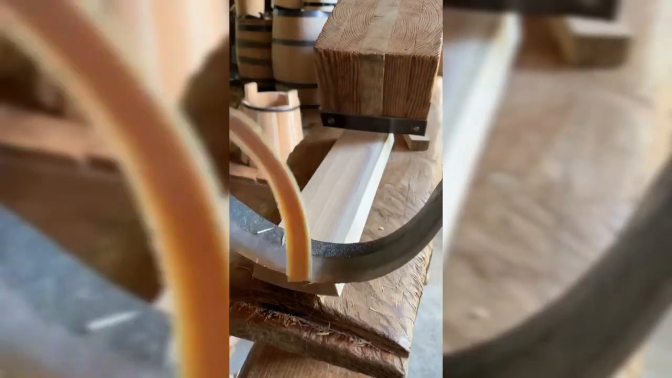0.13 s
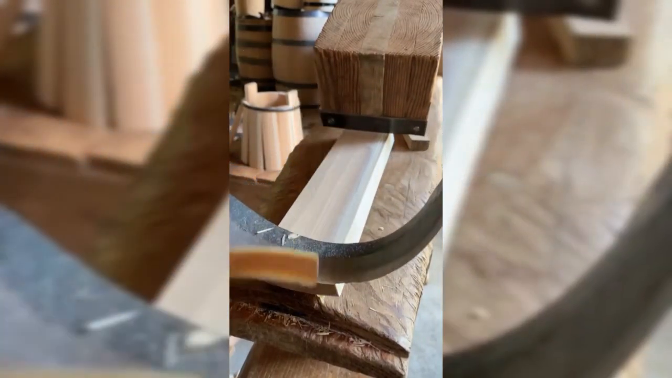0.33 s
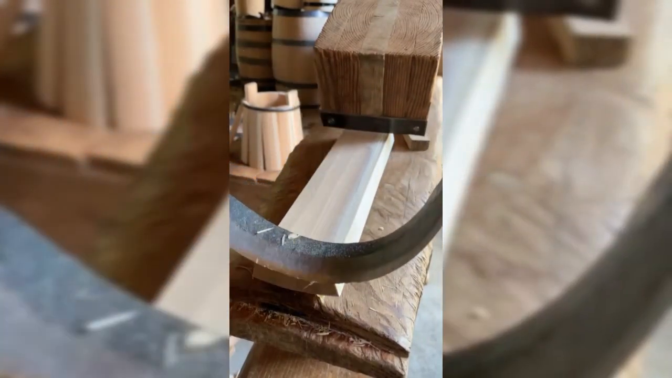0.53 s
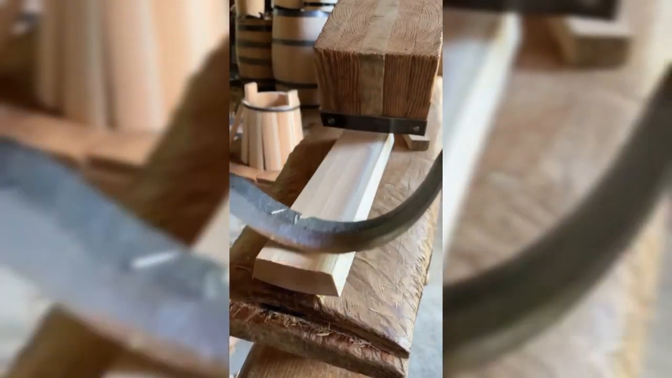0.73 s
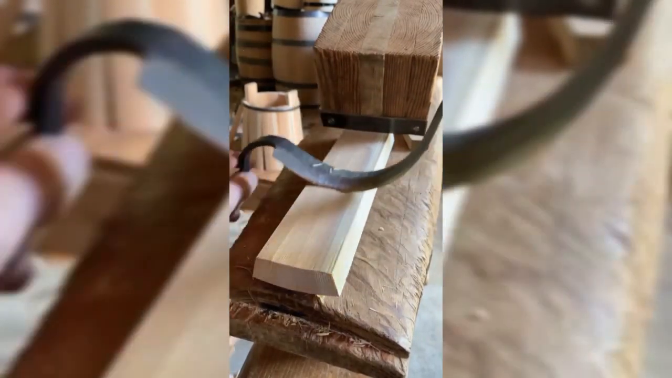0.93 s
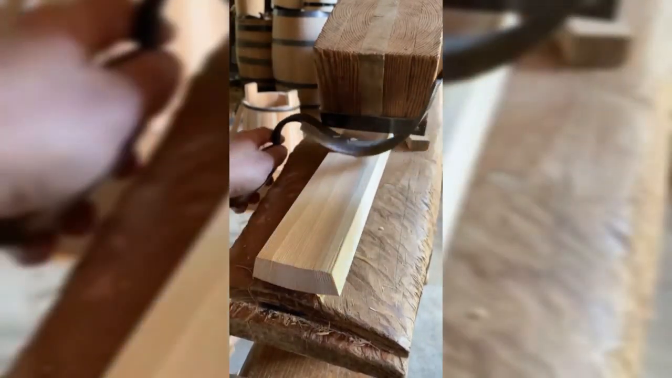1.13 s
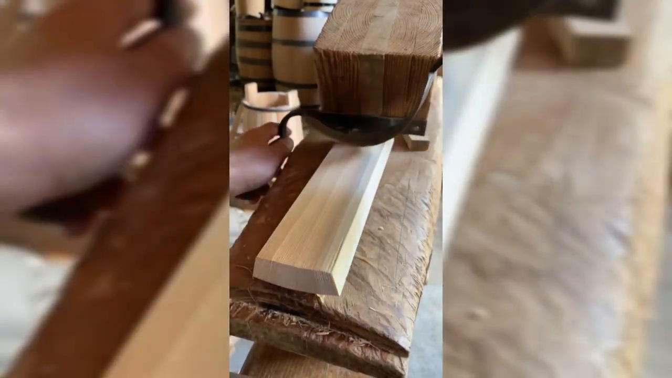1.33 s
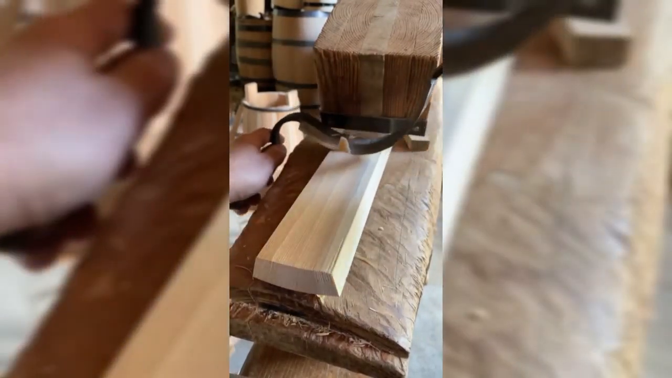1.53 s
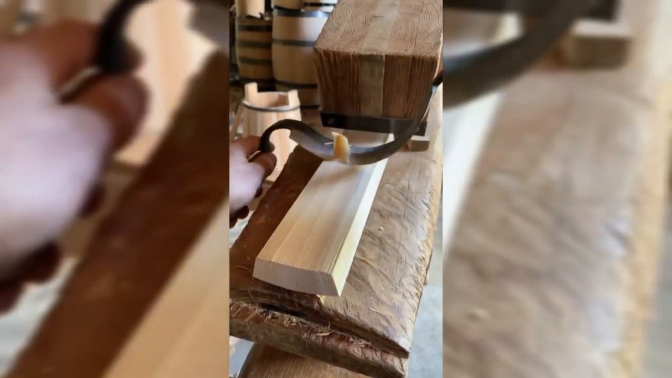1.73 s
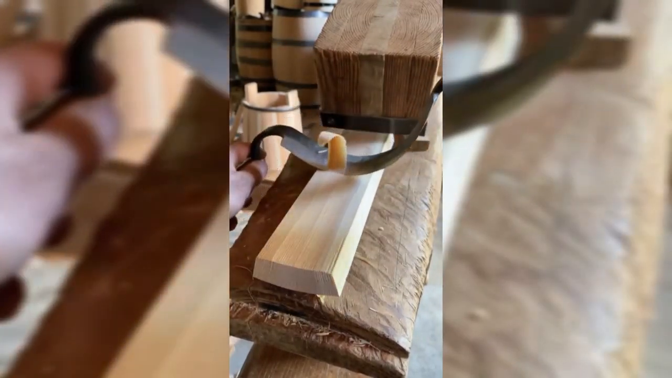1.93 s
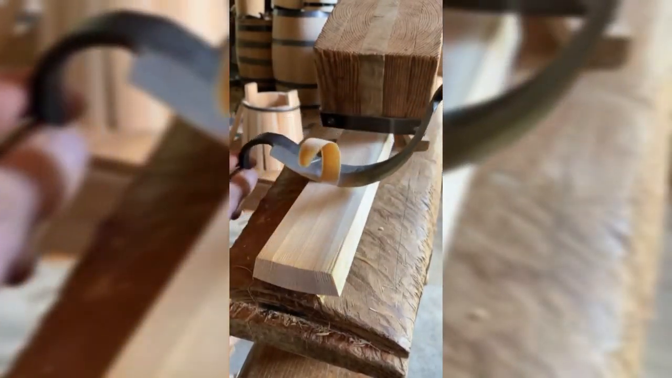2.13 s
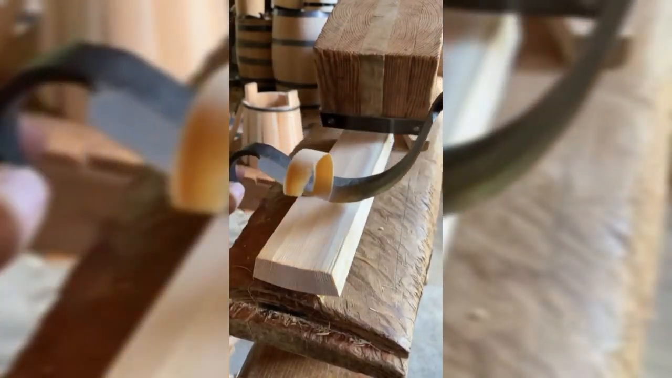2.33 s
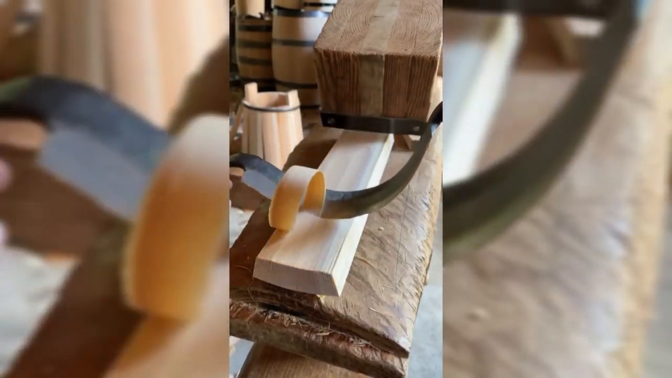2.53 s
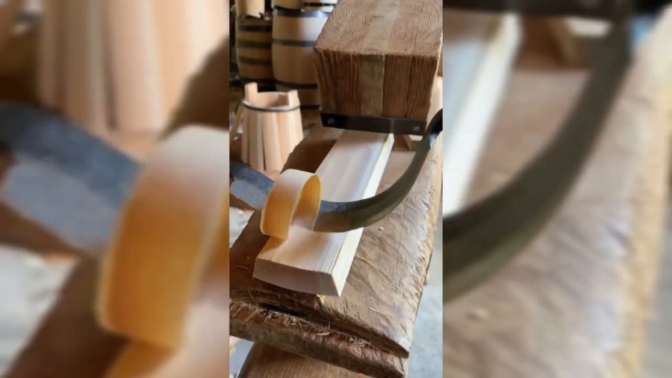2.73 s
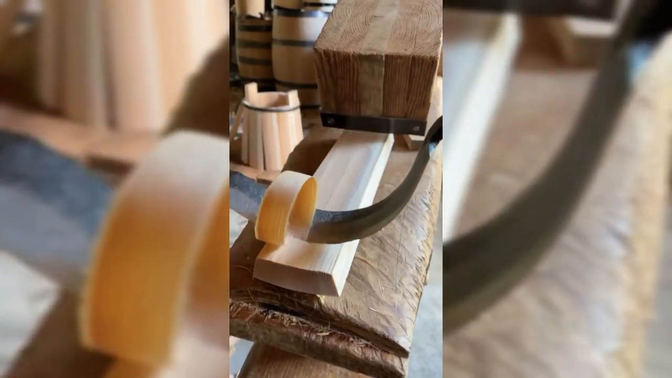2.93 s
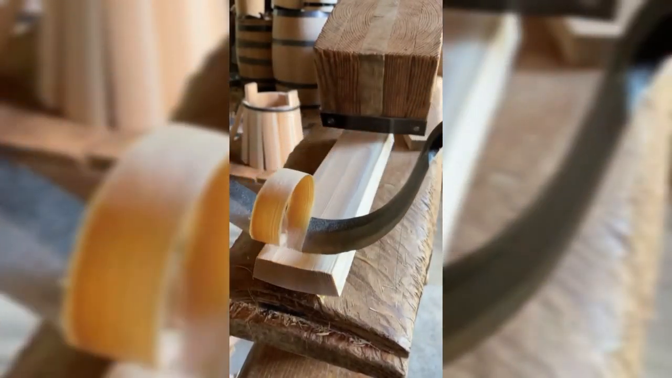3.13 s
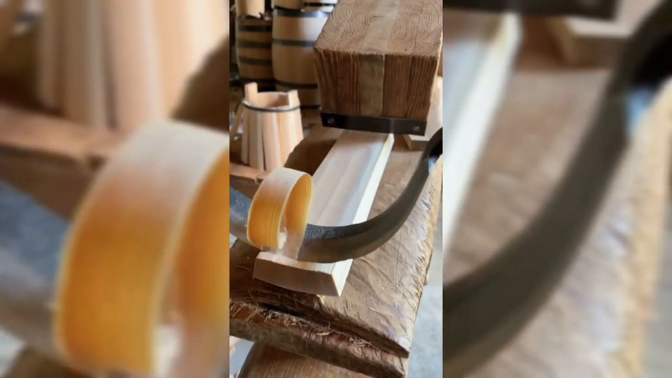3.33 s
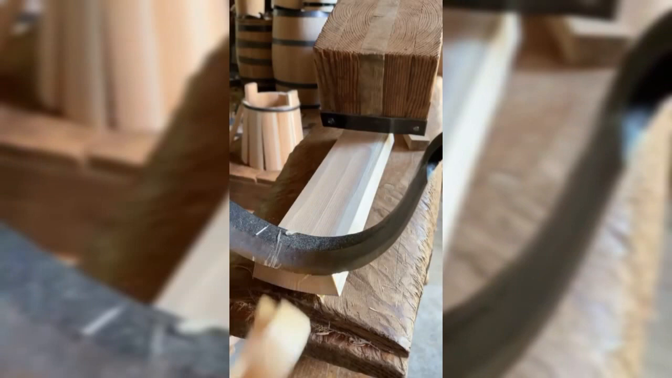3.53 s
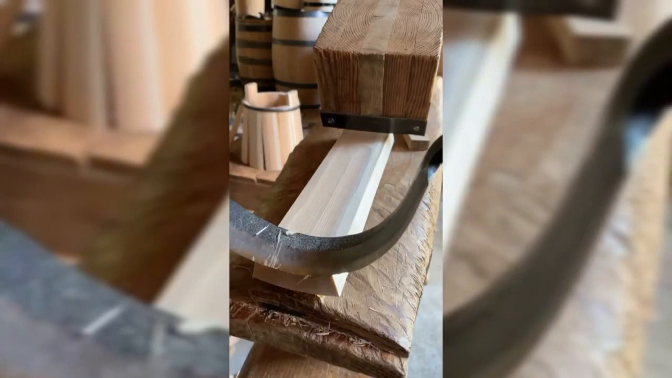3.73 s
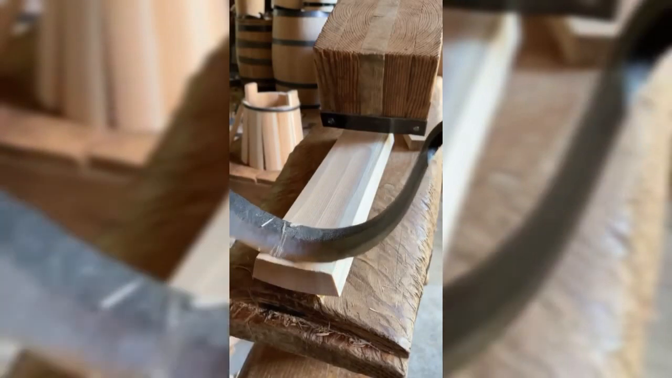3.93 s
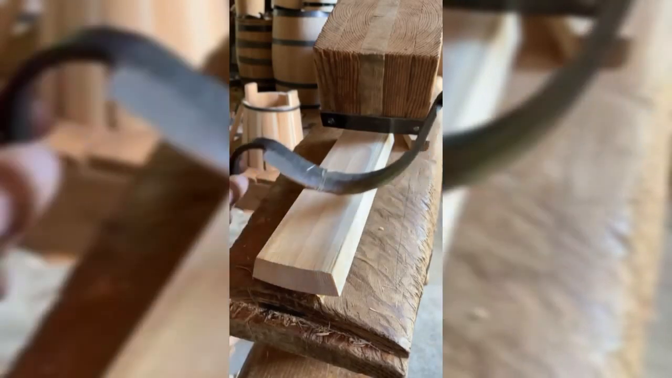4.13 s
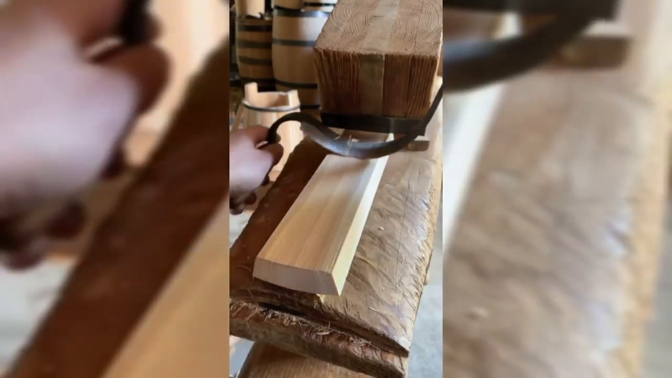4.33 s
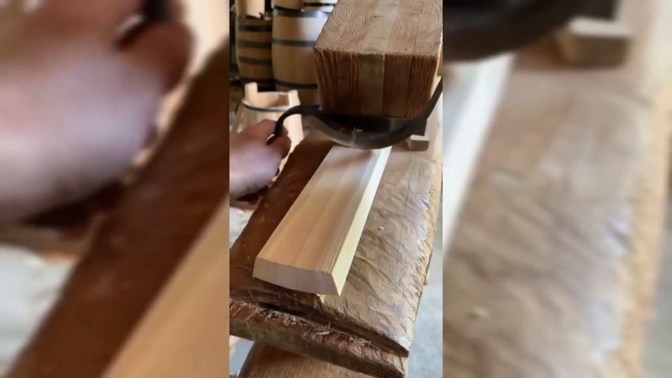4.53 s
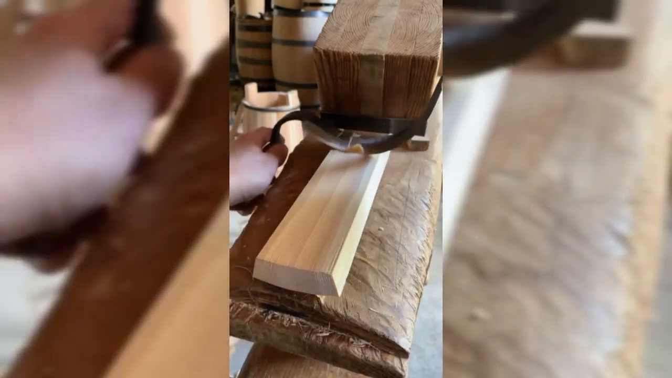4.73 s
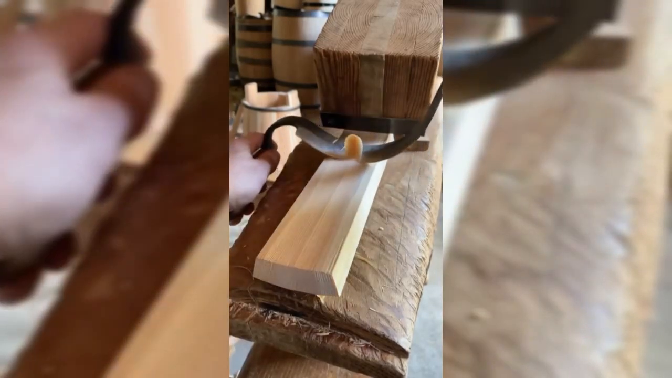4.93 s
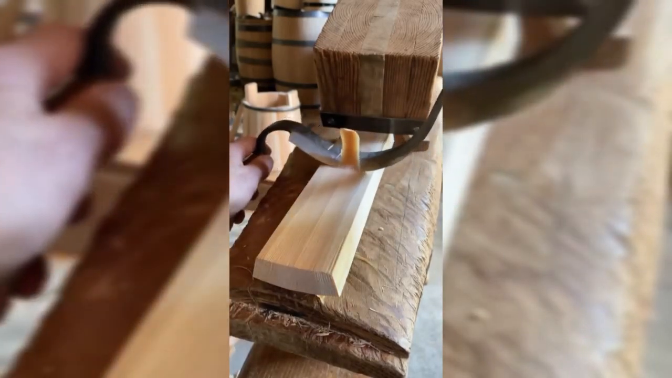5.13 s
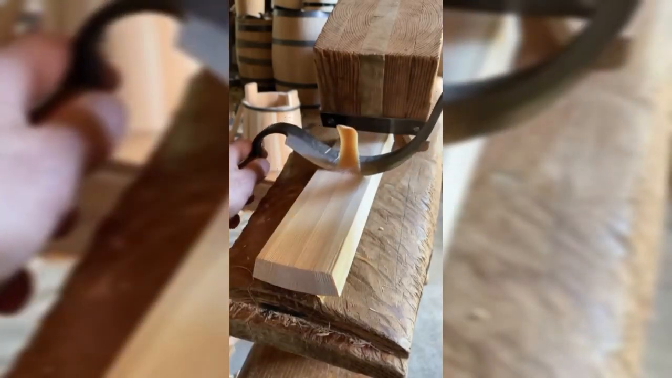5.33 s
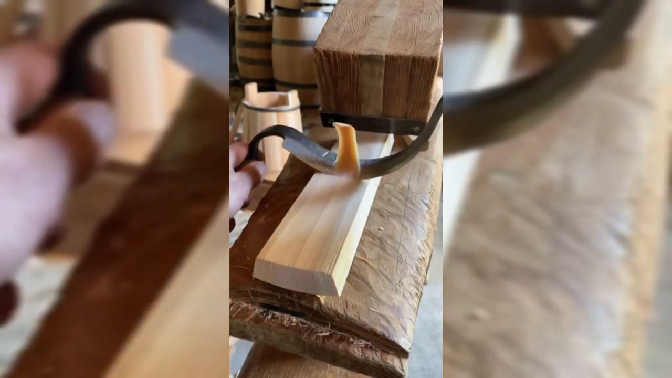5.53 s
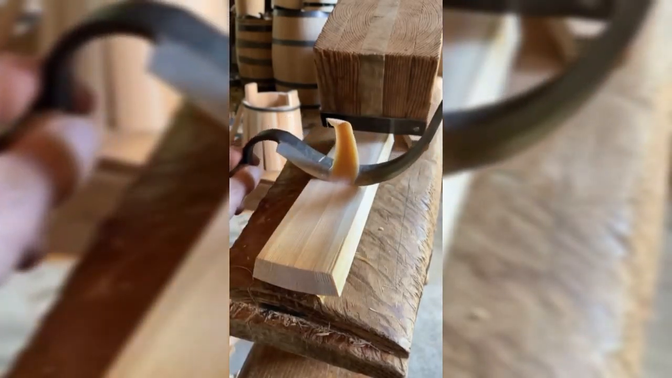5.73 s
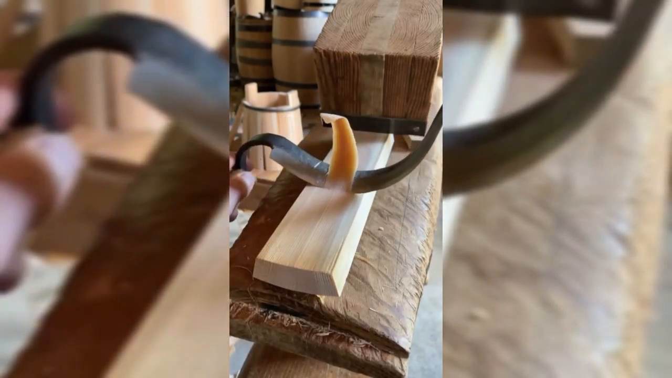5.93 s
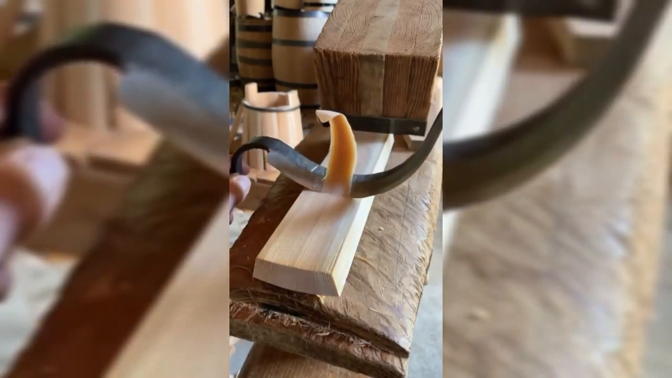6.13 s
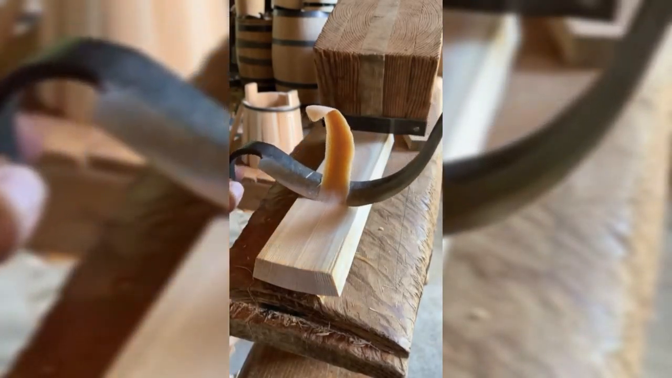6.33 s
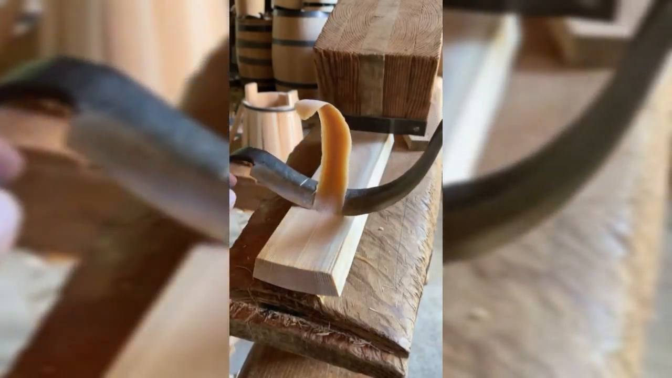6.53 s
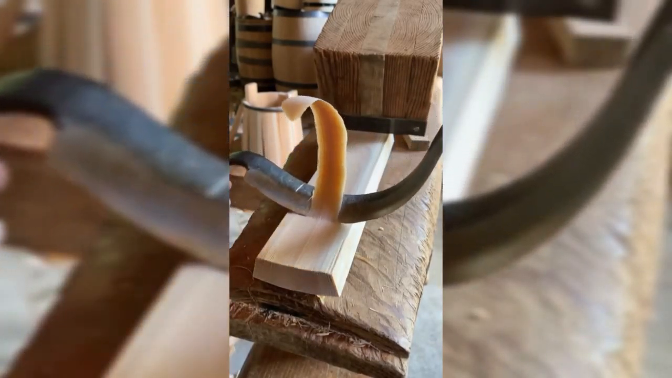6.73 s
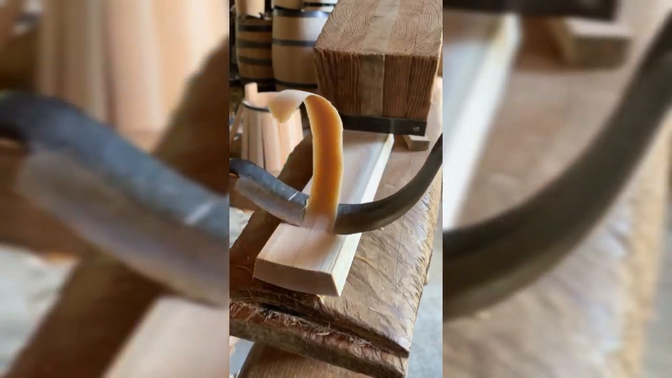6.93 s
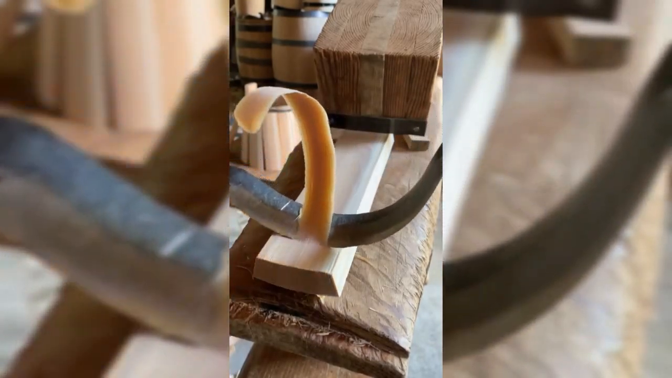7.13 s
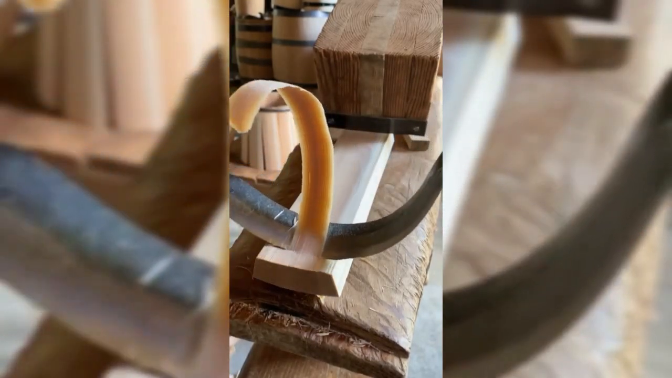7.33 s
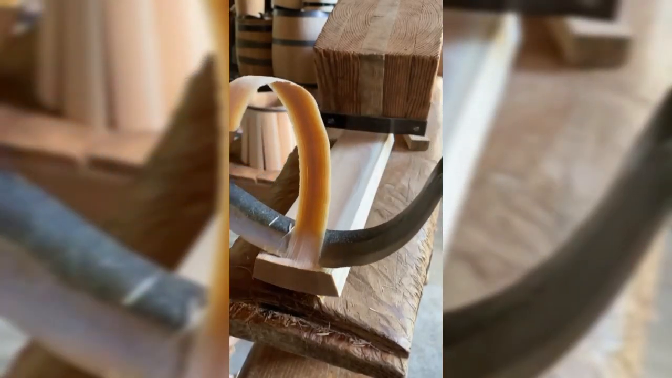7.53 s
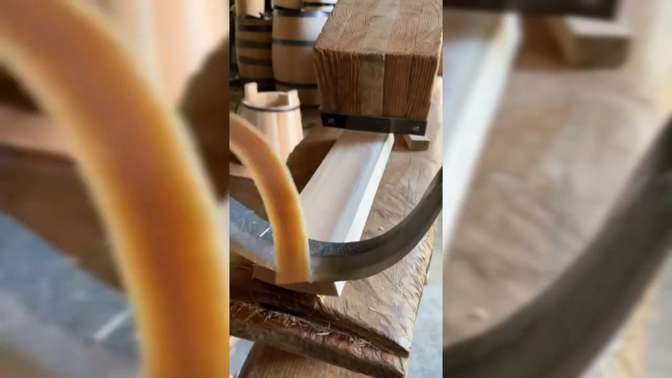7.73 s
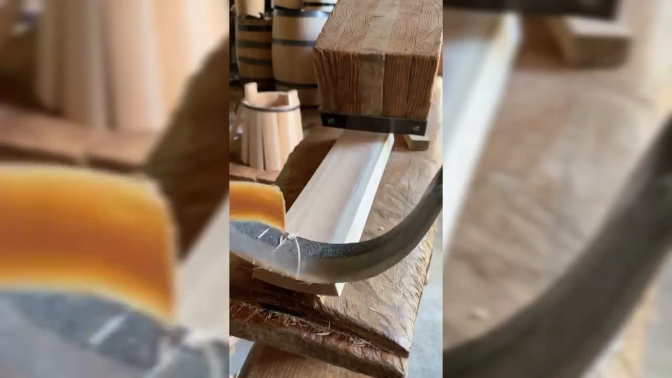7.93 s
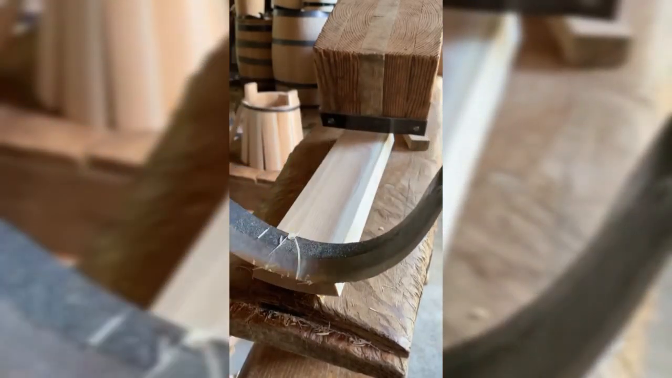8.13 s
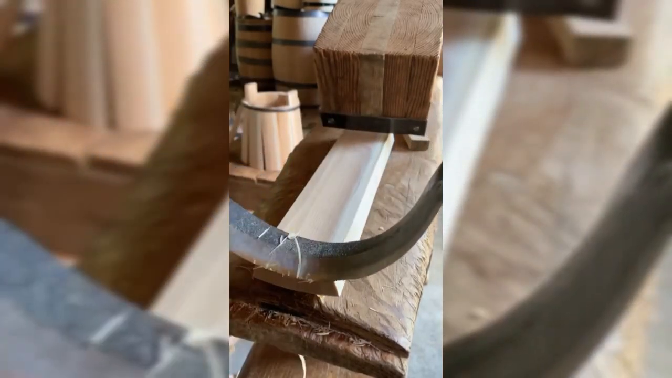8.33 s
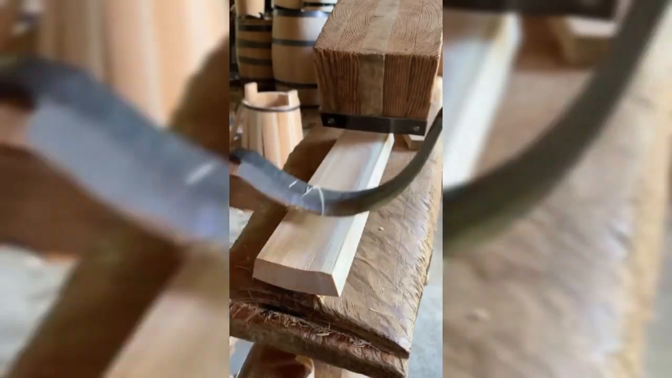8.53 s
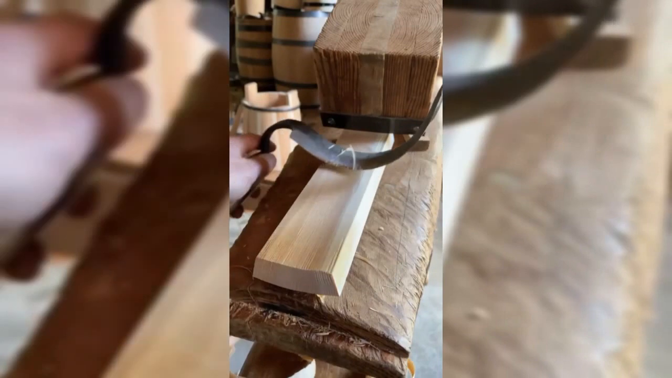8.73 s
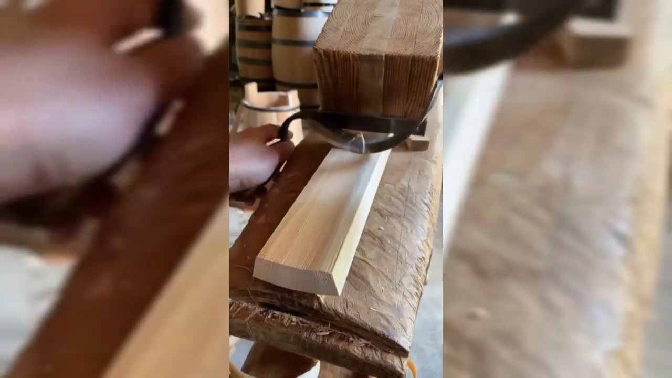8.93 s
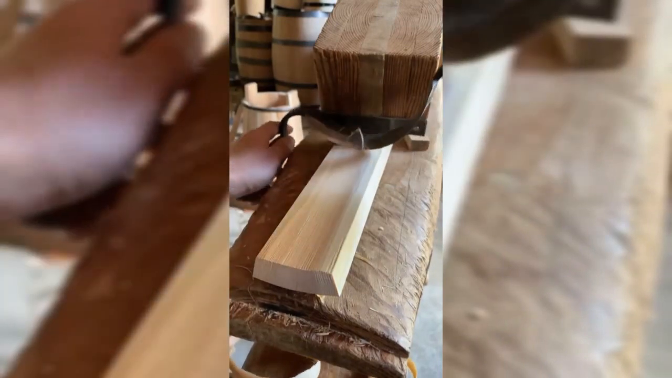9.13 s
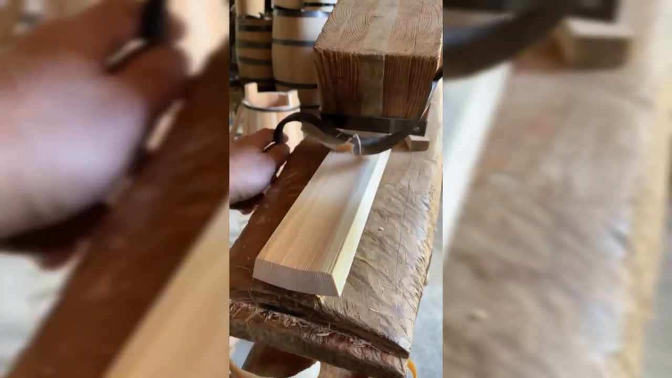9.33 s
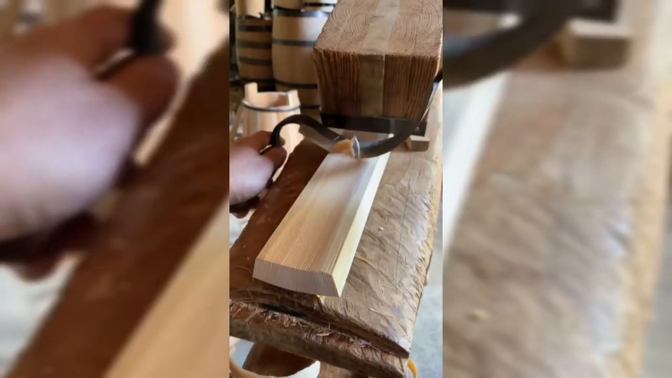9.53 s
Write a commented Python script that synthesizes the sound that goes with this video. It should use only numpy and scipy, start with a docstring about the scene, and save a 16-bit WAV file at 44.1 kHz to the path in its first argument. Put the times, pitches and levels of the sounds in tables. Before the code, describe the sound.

Close to a wooden bench in a quiet workshop, with faint low rumble and a short room tail. At 0-0.2 seconds a shaving stroke finishes in a sharp splinter crack and tearing, with a dull knock. Small ticks, woody knocks and soft scuffing follow until 1.4 as the blade slides back. From 1.5 to 3.6 it pulls through softwood: a gritty mid rasp rising slightly, bright fibrous hiss, low board shudder and scattered splinter snaps. Between 3.8 and 4.7 there are light knocks, sliding and a faint groan. A longer pull runs 4.75-7.8, strong at first, then thinner and uneven, growing cracklier and fizzier, with a big snap near 7.6 and a cluster of cracks as the shaving breaks free. Near-quiet follows, with faint ticks; small knocks and scuffs begin at 8.4, then a firm hollow knock at 9.0. A fresh rasp begins at 9.3 and is cut off.

```python
"""In a workshop, close by: a curved drawknife works a softwood board clamped in a shaving horse.
A pull is ending: splinters crack, the shaving tears off, then the blade slides back and knocks on the board.
Two pulls follow, the second longer, with sliding, knocks and ticks between; a fourth has just begun at the end.
Random streams of fibre breaks, shaped by resonances and spectra, make hiss, rasp and shake; knocks are
sums of decaying modes. A short room tail and a low rumble lie under it all."""
import sys
import numpy as np
from scipy import signal
from scipy.fft import rfft, irfft, next_fast_len
from scipy.io import wavfile
from scipy.ndimage import uniform_filter1d, map_coordinates

SR = 44100
rng = np.random.default_rng(int(sys.argv[2]) if len(sys.argv) > 2 else 0)


def store_wav(level_fs):
    """Save 16-bit WAV to argv[1]."""
    pcm = np.round(np.clip(np.atleast_2d(level_fs), -1, 1) * 32767)
    wavfile.write(sys.argv[1], SR, pcm.T.astype(np.int16))


N = 422037
TIME = np.arange(N) / SR  # [s]


def gain_of(db):
    """Decibels to amplitude."""
    return 10 ** (np.asarray(db) / 20)


def evened(x):
    """Scales to rms 1."""
    return x / np.sqrt(np.mean(x ** 2) + 1e-20)


def read(points, hz):
    """Reads a curve over frequency on a logarithmic axis."""
    f, value = np.transpose(points)
    return np.interp(np.log(hz + 1), np.log(f + 1), value)


def add(mix, s, sound):
    """Mixes a sound in at a time in seconds."""
    part = mix[max(round(s * SR), 0):][:len(sound)]
    part += sound[:len(part)]


def colour(x, points):
    """Gives x a spectrum, at rms 1."""
    size = next_fast_len(len(x))
    filter_gain = gain_of(read(points, np.fft.rfftfreq(size, 1 / SR)))
    return evened(irfft(rfft(x, size) * filter_gain, size)[:len(x)])


def resonate(x, hz, width):
    """A resonance of gain 1 whose pitch can follow a curve; width in Hz."""
    turn = np.exp(2j * np.pi * np.cumsum(hz * np.ones(len(x))) / SR)
    r = np.exp(-np.pi * width / SR)
    # shift the pitch down to zero, smooth, and shift it back
    smooth = signal.lfilter([1 - r], [1, -r], x / turn + 1e-18)
    return 2 * (turn * smooth).real


def narrowed(x, hz, first_width, second_width):
    """Two resonances in a row at one pitch, for steeper sides."""
    return resonate(resonate(x, hz, first_width), hz, second_width)


def mode_bank(x, modes):
    """Parallel resonances driven by one signal, at rms 1."""
    return evened(sum(gain_of(db) * resonate(x, hz, width) for hz, width, db in modes))


def wander(count):
    """Random curve of rms 1 with count knots a second, joined by straight lines."""
    knots = rng.standard_normal(N * count // SR + 2)
    return evened(np.interp(TIME * count, np.arange(len(knots)), knots))


def fractures(per_s, spread_db):
    """A stream of tiny breaks, most small and a few large."""
    size = gain_of(spread_db * np.minimum(rng.exponential(1, N), 4))
    happens = rng.random(N) < per_s / SR
    return evened(size * rng.choice([-1, 1], N) * happens)


def scatter(x, share, decay_s):
    """Board, blade and clamp throw back close echoes that ripple the spectrum."""
    t = np.arange(512) / SR
    echoes = rng.standard_normal(len(t)) * np.exp(-t / decay_s)
    return evened(x + share * signal.oaconvolve(x, echoes / np.linalg.norm(echoes))[:N])


def shift_patches(x, slow_db, quick_db):
    """Random patches over time and pitch keep shifting which pitches stand out; rms 1."""
    z = signal.stft(x, SR, nperseg=512, noverlap=384)[2]

    def patches(size, count):
        """Smooth random map: size in frequency bins, count in time frames."""
        grid = np.indices(z.shape) / np.reshape([size, count], (2, 1, 1))
        knots = rng.standard_normal((len(z) // size + 2, z.shape[1] // count + 2))
        return evened(map_coordinates(knots, grid, order=1))

    z = z * gain_of(slow_db * patches(size=2, count=14) + quick_db * patches(size=16, count=6))
    return evened(signal.istft(z, SR, nperseg=512, noverlap=384)[1][:N])


# spectrum of the quiet place: (frequency [Hz], level [dB per Hz])
QUIET_SPECTRUM = [(12, -42), (20, -20.5), (59, 10.5), (105, 4), (741, -16), (2200, -18), (2810, -20.5),
                  (5100, -23.5), (6880, -28), (12200, -53), (13200, -48)]
QUIET_DB = -58


def room_rumble():
    """The low rumble of the room is steady coloured noise."""
    return gain_of(QUIET_DB) * colour(rng.standard_normal(N), QUIET_SPECTRUM)


# how fast the workshop dies away: (frequency [Hz], t60 [s])
ROOM_DECAY = [(100, 0.083), (1000, 0.41), (4000, 0.16), (12000, 0.1)]


def workshop(x):
    """A short diffuse tail, each band dying at its own speed."""
    taps = rng.standard_normal(SR // 2) * (np.arange(SR // 2) > SR * .006)
    hz, t, z = signal.stft(taps, SR, nperseg=256)
    decay = gain_of(-60 * t / read(ROOM_DECAY, hz)[:, None])
    tail = signal.istft(z * decay, SR, nperseg=256)[1]
    return signal.fftconvolve(x, tail / np.linalg.norm(tail))[:N]


# pulls from clamp to free end, also played by pulls():
# (start [s], end [s], final curl: how far the shaving stands off [0-1])
STROKES = [(-2.8, .222, .9), (1.53, 3.6, .22), (4.755, 7.8, 1), (9.295, 11.8, .2)]
# the blade sliding back: (start [s], end [s], scuff level [dB], wooden rub level [dB])
SLIDES = [(.74, 1.12, -62, -62), (1.05, 1.3, -63, -61), (1.33, 1.48, -63, -61), (3.82, 4.22, -59.5, -60.5),
          (4.15, 4.52, -58.5, -59), (4.38, 4.72, -64, -63), (8.36, 8.97, -61, -59), (8.98, 9.32, -65, -55)]
SLIDE_ARCH, SLIDE_SKEW = .7, .6  # exponents: a slide swells early and fades slowly
HANDLING_DB = -69  # the board creaks faintly under the hands all the time
RUSTLE_DB, RUSTLE_S = -55, .15  # the freed shaving settles; level at full curl, decay time


def slides():
    """Gains of scuff and rub: an arch for each slide, and the fading rustle of each freed shaving."""
    scuff, rub = np.zeros(N), np.full(N, gain_of(HANDLING_DB))
    for start, end, scuff_db, rub_db in SLIDES:
        u = np.clip((TIME - start) / (end - start), 0, 1)
        arch = abs(np.sin(np.pi * u ** SLIDE_SKEW)) ** SLIDE_ARCH
        scuff = np.maximum(scuff, gain_of(scuff_db) * arch)
        rub = np.maximum(rub, gain_of(rub_db) * arch)
    for start, end, curl in STROKES:
        fade = (TIME > end) * np.exp(-abs(TIME - end) / RUSTLE_S)
        scuff = scuff + gain_of(RUSTLE_DB) * curl * fade
    return scuff, rub


# spectrum of the light scuff: (frequency [Hz], level [dB per Hz])
SCUFF_SPECTRUM = [(710, -8), (1200, -7.5), (1590, -15), (1740, -8.5), (2210, -12.5), (3410, -7),
                  (4650, -11), (5510, -8), (13000, -18), (13600, -35)]
# modes of the dragging blade: (frequency [Hz], width [Hz], level [dB])
DRAG_MODES = [(820, 70, -3), (1320, 35, 0), (1740, 45, -2)]
DRAG_DB = -10  # relative to the wooden rub


def sliding():
    """The unloaded blade scuffs lightly over the cut face and stirs the board."""
    grit = fractures(per_s=3000, spread_db=3.4) * gain_of(3.0 * wander(count=70))
    scuff = shift_patches(colour(grit, SCUFF_SPECTRUM), slow_db=4.0, quick_db=3.0)
    # the lightest touch only brushes the tips of the grain, so the top of the scuff comes and goes
    top = signal.sosfilt(signal.butter(1, 6000, "high", fs=SR, output="sos"), scuff)
    scuff = scuff + top * (gain_of(7.0 * np.tanh(wander(count=22)) - 3.5) - 1)
    rub = colour(grit, [(100, -7), (140, 4), (190, 7), (255, 6.5), (310, 10.5), (390, 9), (550, 1),
                        (850, -2.5), (1100, -12), (1300, -9.5), (2000, -47)])
    steel = mode_bank(grit, DRAG_MODES)  # the dragging blade rings faintly
    scuff_gain, rub_gain = slides()
    return scuff * scuff_gain + (rub + gain_of(DRAG_DB) * steel) * rub_gain


def ring(modes, t, held):
    """Decaying sines, each slightly detuned; held is the ring length as a share of the free ring."""
    total = 0
    for hz, db, t60 in modes:
        phase = 2 * np.pi * hz * rng.uniform(.985, 1.015) * t + rng.uniform(0, 2 * np.pi)
        total = total + gain_of(db - 60 * t / (t60 * held)) * np.sin(phase)
    return total


# the blade set down or bumping on the board: (time [s], wood level [dB], main ring [Hz],
# steel ring level re wood [dB], share of the free ring length, fall of the other modes [dB per octave])
KNOCKS = [(.178, -34, 175, -22, .8, 14), (.606, -42, 700, -20, .25, 10), (.752, -31.5, 440, -17, .35, 5),
          (.791, -31.5, 480, -35, .25, 13), (.95, -42.5, 450, -27.5, .25, 8), (1.062, -29, 210, -1, .8, 10),
          (1.345, -27, 300, -21, 1.05, 14), (3.845, -42, 550, -20, .4, 8), (3.885, -43, 600, -25, .4, 8),
          (3.915, -34.5, 620, -12, .25, 7), (3.996, -45, 480, -25, .3, 10),
          (4.196, -39.5, 430, -15, .4, 10), (8.413, -38.5, 600, -15, .4, 10),
          (8.453, -38.5, 654, 2, .3, 10), (8.574, -36, 447, -28, .13, 10), (8.733, -37, 420, -8, .25, 10),
          (9.008, -22, 265, -9, .75, 8), (9.122, -37, 330, -17, .8, 10)]
# modes of the board: (frequency [Hz], level [dB], free t60 [s])
BOARD_MODES = [(135, -7, .12), (201.6, -8, .12), (258, 1, .2), (321.5, -2, .093), (369, -1, .19),
               (440, -5, .12), (560, -6, .11), (655, -1, .11), (775, -4, .1), (900, -6, .07),
               (1090, -11, .05)]
# modes of the knocking steel: (frequency [Hz], level [dB], free t60 [s])
STEEL_MODES = [(1250, -2, .08), (1325, -5, .115), (1400, -3, .063), (1734, -16, .2), (1775, -3, .062),
               (2293, -22, .09), (2504, -15, .12), (3330, -19, .12)]


def knocks():
    """The blade meets the board: steel rings at once, the board follows; the place of the blow picks its modes."""
    out, t = np.zeros(N), np.arange(SR // 3) / SR
    for s, db, main_hz, steel_db, held, fall_db in KNOCKS:
        struck = [(f, d - fall_db * abs(np.log2(f / main_hz)), t60) for f, d, t60 in BOARD_MODES]
        wood = ring(struck, t, held) * (1 - np.exp(-t / (.008 * held)))
        steel = ring(STEEL_MODES, t, .75 * held) * (1 - np.exp(-t / 0.00032))
        thud = colour(rng.standard_normal(len(t)) * np.exp(-t / (0.022 * held)),
                      [(70, 2), (140, 8), (700, 2), (1100, -12), (4000, -37)])
        tick = colour(rng.standard_normal(len(t)) * np.exp(-t / 0.0057),
                      [(300, -8), (800, -24), (2000, -3), (4500, -21.5), (9000, -28.5)])
        bright = steel / abs(steel).max() + .45 * tick / abs(tick).max()
        blow = wood / abs(wood).max() + gain_of(-12.5) * thud / abs(thud).max()
        blow += gain_of(steel_db) * bright
        add(out, s, gain_of(db) * np.sqrt(1 - t / t[-1]) * blow)
    return out


# the shaving tearing along the grain or brushing past the blade:
# (time [s], length [s], level [dB], centre [Hz])
TEARS = [(.034, .032, -38.5, 11000), (.106, .044, -43, 7300), (.194, .03, -30, 7400),
         (1.94, .055, -37, 8700), (2.033, .03, -38, 9500), (2.78, .032, -43, 11000),
         (2.905, .048, -41, 9000), (3.048, .04, -37.5, 8000), (3.364, .028, -44, 6000),
         (3.51, .045, -44, 2400), (3.553, .05, -38.5, 5600), (6.548, .022, -38, 8500),
         (6.725, .04, -40, 8000), (6.972, .048, -36, 7700), (7.147, .034, -36, 11500),
         (7.322, .028, -36.5, 9500), (7.718, .036, -35.5, 9000), (7.748, .052, -31, 5400),
         (7.92, .085, -61, 11000), (8.178, .05, -57, 8000), (8.245, .042, -57, 8500)]


def tearing():
    """A split runs ahead of the edge in a short, coarse rip; the loose strip rings at its own pitch."""
    rip = fractures(per_s=5000, spread_db=2.2) * gain_of(4.0 * np.tanh(wander(count=220)))
    broad = colour(rip, [(300, -33), (1200, -22), (2400, -3), (3000, -4), (4000, -7.5), (5800, -1.5),
                         (7400, 2.5), (10000, -3), (13050, -5), (13600, -35)])
    out = np.zeros(N)
    for s, length, db, hz in TEARS:
        t = np.arange(int(length * SR)) / SR
        part = slice(int(s * SR), int(s * SR) + len(t))
        strip = evened(narrowed(rip[part], hz, .22 * hz, .45 * hz))
        gate = np.sin(np.pi * (t / length) ** .8) ** .6
        add(out, s, gain_of(db) * gate * evened(strip + gain_of(1.0) * evened(broad[part])))
    return out


# modes of a sliver: (multiple of its pitch, level [dB])
SLIVER_MODES = [(.72, -11), (1, 0), (1.5, -10)]
SLIVER_TOP_HZ = 13000  # sliver modes above this pitch are left out


def crack(out_db, hz, length, wood_db, snap_db):
    """A ragged run of snaps that builds up to its middle, rings a sliver of wood and taps the board."""
    t = (np.arange(2048) - 1024) / SR
    swell = np.exp(-(abs(t) / max(.75 * length, .0004)) ** 1.3) + .08 * np.exp(-abs(t) / 0.0019)
    run = rng.standard_normal(len(t)) * swell * (rng.random(len(t)) < .3)
    sliver = [(hz * ratio, db) for ratio, db in SLIVER_MODES if hz * ratio < SLIVER_TOP_HZ]
    ringing = evened(sum(gain_of(db) * evened(narrowed(run, f, 700, 1900)) for f, db in sliver))
    snap = colour(run, [(900, -25), (2500, -5), (7000, 5), (12500, 4), (15500, -8)])
    tap = rng.standard_normal(len(t)) * np.exp(-abs(t) / 0.0028) * (t > -.001)
    tap = colour(tap, [(120, -17), (400, -6), (900, -8.5), (2300, -6), (5000, -11), (9000, -28)])
    sound = ringing + gain_of(snap_db) * snap + gain_of(wood_db) * tap
    # the level counts the whole energy as if spread over 10 ms
    return gain_of(out_db) * sound / np.sqrt(np.sum(sound ** 2) / (SR / 100))


# the big splinters, also used by hiss_dips(): (time [s], level over 10 ms [dB], centre [Hz],
# length scale [s], bright snap re ring [dB])
SPLINTERS = [(.0865, -39, 3600, .0015, -4), (.1555, -30, 6900, .0045, -8), (.159, -34, 12000, .002, -10),
             (.166, -37, 10000, .0015, -10), (.171, -34, 10000, .002, -10), (.1815, -18, 7130, .0025, -18),
             (.1925, -33, 10000, .0006, -9), (1.878, -38, 7900, .0043, -8), (2.0657, -37, 7850, .003, -8),
             (2.089, -38, 7000, .0025, -8), (2.844, -42, 9000, .002, -8), (2.855, -36, 8000, .003, -8),
             (2.989, -34.5, 8500, .003, -1), (3.2175, -40, 7400, .002, -4), (3.237, -44, 6500, .002, -6),
             (3.31, -37.5, 3600, .002, -2), (3.355, -41, 5800, .002, -3), (3.3633, -41.5, 5800, .002, -7),
             (3.5005, -37, 5200, .0037, -7), (3.527, -45, 5000, .004, -12), (3.5645, -36, 7000, .003, -8),
             (3.577, -37, 9500, .0025, -5), (3.591, -36.5, 3800, .005, -4), (5.3945, -36, 8500, .0015, -10),
             (5.4114, -33, 3000, .0075, -22), (5.454, -43, 6000, .003, -5), (6.244, -38.5, 4200, .0018, 1),
             (6.283, -35.5, 11700, .003, -7), (6.298, -39.5, 11500, .002, -4), (6.322, -37, 11500, .003, 0),
             (6.399, -36.5, 8500, .003, -5), (6.405, -38, 10500, .0025, -10), (6.4135, -34, 8250, .003, -3),
             (6.485, -38, 9000, .003, -9), (6.587, -40, 8340, .003, -9), (6.8269, -35.5, 10300, .0045, -6),
             (6.931, -39.5, 12000, .002, -12), (6.997, -35, 7700, .007, -10), (7.096, -38, 7500, .002, 0),
             (7.109, -44, 5000, .0045, -15), (7.219, -43, 4500, .001, -8), (7.2245, -39, 7500, .0015, -10),
             (7.2328, -33, 8000, .003, 1), (7.2917, -34, 8700, .0012, -8), (7.322, -36.5, 4500, .002, -1),
             (7.533, -36, 12000, .002, -9), (7.547, -39, 11000, .002, -9), (7.5625, -36, 12000, .002, -9),
             (7.573, -36, 12000, .0015, -9), (7.592, -38, 11500, .0015, -12),
             (7.6085, -26, 7240, .0034, -7), (7.683, -42, 8500, .002, -10), (7.694, -34, 11000, .0006, -6),
             (7.698, -33, 7850, .002, -8), (7.7155, -31, 10000, .0018, -7), (7.74, -35, 7950, .002, -6),
             (7.758, -30, 7500, .0016, -6), (7.768, -32, 6000, .002, -6), (7.777, -26.5, 6500, .0018, -3),
             (7.787, -33.5, 5400, .002, -6)]
# the edge ticks against the wood between strokes: (time [s], level over 10 ms [dB], centre [Hz])
TICKS = [(.435, -47, 7740), (.4587, -52.5, 5000), (.604, -48, 7600), (.7387, -43, 6400), (.754, -41, 7000),
         (.76, -47, 3700), (3.8414, -45, 4040), (4.5042, -47, 2100), (8.03, -48, 7140), (8.042, -52, 7000),
         (8.087, -56, 4500), (8.156, -55, 4000), (8.4116, -47.5, 4160), (8.451, -47, 6000),
         (8.852, -48, 3140)]
THICK_HZ, THIN_DB_PER_OCTAVE = 4200, -18  # thick, low splinters tap the board; thinner ones hardly do
TICK_S, TICK_WOOD_DB, TICK_DULL_DB_PER_OCTAVE = .0033, -4.5, -18  # lower ticks snap less
CHIPS_PER_S = 60  # rate at the free end
CHIP_DB, CHIP_SPREAD_DB = -2.5, 3  # relative to the hiss gain; spread either way
CHIP_HZ, CHIP_S = 7800, .002  # centre before its random factor; length scale


def splinters(place, hiss_gain):
    """Big splinters and ticks of the edge, and small chips at random as the edge nears the free end."""
    cracks = []
    for s, db, hz, length, snap_db in SPLINTERS:
        wood_db = -2 + THIN_DB_PER_OCTAVE * max(np.log2(hz / THICK_HZ), 0)
        cracks.append((s, db, hz, length, wood_db, snap_db))
    for s, db, hz in TICKS:
        snap_db = -3 + TICK_DULL_DB_PER_OCTAVE * max(np.log2(THICK_HZ / hz), 0)
        cracks.append((s, db, hz, TICK_S, TICK_WOOD_DB, snap_db))
    out = np.zeros(N)
    for s, *shape in cracks:
        sound = crack(*shape)
        add(out, s + .0011 - len(sound) / 2 / SR, sound)
    for at in np.flatnonzero(rng.random(N) < CHIPS_PER_S * place / SR):
        db = CHIP_DB + CHIP_SPREAD_DB * rng.uniform(-1, 1)
        sound = crack(db, CHIP_HZ * rng.uniform(.55, 1.4), CHIP_S, wood_db=-18, snap_db=-12)
        add(out, at / SR - len(sound) / 2 / SR, hiss_gain[at] * sound)
    return out


HISS_DIP_DB, HISS_DIP_S = -4.5, .034  # depth and length of a dip


def hiss_dips():
    """Gain of the fine hiss: it dips briefly around each big splinter."""
    near, hump = np.zeros(N), np.hanning(int(HISS_DIP_S * SR))
    for s, *_ in SPLINTERS:
        add(near, s - HISS_DIP_S / 2, hump)
    return gain_of(HISS_DIP_DB * np.minimum(1.5 * near, 1))


DIG_S = .05  # width of a shudder or push


def swells(rows):
    """A smooth hump of the given height at each time."""
    return sum(height * np.exp(-.5 * ((TIME - s) / DIG_S) ** 2) for s, height in rows)


def stroke_curve(curves, which):
    """Reads, at each moment, the curve that belongs to the current stroke."""
    return np.choose(which, [np.interp(TIME, *np.transpose(rows)) for rows in curves])


# how hard the edge bites, one curve a stroke: (time [s], effort [dB])
EFFORT = [
    [(.08, -51), (.15, -47)],
    [(1.65, -44.5), (1.92, -41.5), (2.1, -45), (2.6, -44.5), (2.9, -48), (3.42, -52), (3.55, -49.5)],
    [(4.85, -43), (5.22, -42), (5.52, -52), (5.9, -48.5), (6.2, -51.5), (6.4, -47.5), (6.7, -47.5),
     (6.9, -51), (7.15, -47.5), (7.58, -48)],
    [(9.45, -47), (9.57, -50)],
]
# the rasp climbs as the edge sinks, and again near the free end; one curve a stroke: (time [s], centre [Hz])
RASP = [
    [(.05, 2200), (.2, 2300)],
    [(1.55, 1480), (1.8, 1750), (2.1, 1900), (2.55, 1880), (3.0, 2020), (3.55, 2250)],
    [(4.77, 1400), (5.0, 1650), (5.25, 1900), (5.7, 2080), (6.1, 1880), (6.9, 2020), (7.45, 2250),
     (7.78, 2280)],
    [(9.33, 1700), (9.57, 1680)],
]
# brief moments when the cut weakens, in mid-pull or near its end: (start [s], end [s], effort change [dB])
WEAK_MOMENTS = [(3.475, 3.495, -5), (6.2, 6.32, -3.5), (6.845, 6.925, -2), (7.616, 7.69, -9)]
# the board shudders where the edge digs in, and calms where it skims: (time [s], extra shake [dB])
DIGS = [(1.77, -3), (1.95, 3.5), (2.45, 2), (5.05, -2), (5.22, 3), (5.9, 4), (6.42, 9), (6.88, -4),
        (7.07, 8), (7.33, 8), (9.36, -4), (9.54, -6)]
# the blade is pushed into place by the clamp and the board groans: (time [s], shake level [dB])
PUSHES = [(1.22, -55), (4.45, -54)]
ENTRY_S, RELEASE_S, SINK_S = .13, .016, .25  # the edge enters, leaves, and sinks to its full depth
RETURN_S = .4  # time for the way back
CLAMP_HZ, FREE_END_HZ = 268, 180  # the board is stiffer near the clamp; pitches before the waver
CLAMP_REACH = .28  # share of the board's length
BOARD_WAVER = .045  # rms share by which the board's pitch wavers under the hands
FIRST_CURL, CURL_REACH = .5, .7  # the shaving springs up; share of the board to its final curl
HISS_DB, SHALLOW_HISS_DB, CURL_HISS_DB, RASP_DB = -3.5, -7, 1.2, -3.3  # relative to the effort
SHAKE_DB, FULL_EFFORT_DB, SHAKE_POWER = 5.0, -44, 1.25  # the shake outgrows the effort
END_SHAKE_DB = -17.5  # and fades toward the free end


def pulls():
    """Pitches, curl and gains of the cut follow from the effort and the blade's place along the board."""
    starts, ends, curls = np.transpose(STROKES)
    which = np.maximum(np.searchsorted(starts, TIME) - 1, 0)
    age = np.maximum(TIME - starts[which], 0)
    past = np.maximum(TIME - ends[which], 0)
    place = np.minimum(age / (ends - starts)[which], 1)  # 0 at the clamp, 1 at the free end
    shallow = np.exp(-age / SINK_S)

    effort_db = stroke_curve(EFFORT, which)
    weak_db = sum(db * ((TIME > start) & (TIME < end)) * 1. for start, end, db in WEAK_MOMENTS)
    weak_db = uniform_filter1d(weak_db, size=200)
    bite = gain_of(effort_db + weak_db) * np.minimum(age / ENTRY_S, 1) * np.exp(-past / RELEASE_S)
    rasp_hz = stroke_curve(RASP, which)

    reach = place * np.exp(-(past / RETURN_S) ** 2)  # after the cut the blade travels back to the clamp
    board_hz = FREE_END_HZ + (CLAMP_HZ - FREE_END_HZ) * np.exp(-reach / CLAMP_REACH)
    board_hz = board_hz * (1 + BOARD_WAVER * wander(count=14))

    grown = FIRST_CURL + (curls[which] - FIRST_CURL) * np.minimum(place / CURL_REACH, 1)
    curl = np.clip((1 - shallow) ** 3 * grown, 0, 1)
    hiss_db = HISS_DB + SHALLOW_HISS_DB * shallow ** 2 + CURL_HISS_DB * curl
    hiss_gain = bite * gain_of(hiss_db) * hiss_dips()

    shake_db = SHAKE_DB + (SHAKE_POWER - 1) * (effort_db - FULL_EFFORT_DB)
    shake_db = shake_db + END_SHAKE_DB * place ** 2 + swells(DIGS)
    shake = bite * gain_of(shake_db) + swells([(s, gain_of(db)) for s, db in PUSHES])
    return rasp_hz, board_hz, place, curl, hiss_gain, bite * gain_of(RASP_DB), shake


# spectrum of breaking fibres, also played by cutting(): (frequency [Hz], level [dB per Hz])
FIBRE_SPECTRUM = [(1530, -20), (2600, -5.5), (2850, -0.5), (3170, -8), (3630, -1.5), (4040, -3.5),
                  (4450, -2.5), (4950, -4), (5530, -1), (6550, -3), (6950, 3.5), (7600, 5), (8150, 1),
                  (9000, 0), (10900, -10), (12600, -1), (13080, -2), (13500, -35)]


def crackle(per_s, spread_db, count):
    """Single stiff fibres ping as they part, each length at its own pitch; count pitches in all."""
    out, t = np.zeros(N), np.arange(400) / SR
    for hz in np.linspace(4200, 12800, count):
        u = t * hz / rng.uniform(1, 4)
        ping = u ** 2 * np.exp(-u) * np.sin(2 * np.pi * hz * t) * gain_of(.5 * read(FIBRE_SPECTRUM, hz))
        for s, size in rng.random((int(per_s * N / SR / count), 2)):
            add(out, s * N / SR, gain_of(spread_db * min(-np.log(1 - size), 3)) * ping)
    return evened(out)


# spectra of the rasping wood, shaken board and shaken bench: (frequency [Hz], level [dB per Hz])
WOOD_SPECTRUM = [(150, -29), (250, -7), (310, 9), (375, 10), (520, -6), (660, 4), (760, -8), (860, 5),
                 (1150, -4), (2400, 4), (3600, -17)]
BODY_SPECTRUM = [(110, -14), (160, -17), (190, 1.5), (218, -4.5), (255, 5), (310, -9), (372, -1.5),
                 (520, -8), (900, -19.5)]
BENCH_SPECTRUM = [(20, -32), (45, -4), (66, -0.5), (86, 3), (106, -10.5), (132, -4), (190, -6.5),
                  (300, -19.5), (600, -58)]
# modes of the blade while it is in the wood: (frequency [Hz], width [Hz], level [dB])
BLADE_MODES = [(1660, 70, -3), (1835, 38, 3), (2054, 52, 2), (2236, 60, -5), (2490, 50, -2), (2850, 110, 0)]


def cutting(rasp_hz, board_hz, curl, hiss_gain, bite, shake):
    """Fibres break under the edge in clumps as it catches and slips through the grain."""
    catch_db = 1.6 * wander(count=30) + .9 * wander(count=140) + 1.11 * wander(count=600)
    breaks = fractures(per_s=7000, spread_db=0.5) * gain_of(catch_db)

    # a long shaving standing off the blade radiates more of the top octave
    fizz_db = catch_db + 6.5 * np.tanh(wander(count=45))
    fizz = fractures(per_s=2000, spread_db=3.2) * gain_of(fizz_db)
    fizz = colour(fizz, [(5000, -38), (7500, -4), (10500, -2), (13050, -3), (13500, -32)])
    hiss = gain_of(2.5) * scatter(colour(breaks, FIBRE_SPECTRUM), share=0.7, decay_s=0.0061)
    hiss += gain_of(4.0) * curl * fizz
    # random patches keep shifting which pitches of the hiss stand out
    hiss = np.std(hiss) * shift_patches(hiss, slow_db=3.8, quick_db=2.8)
    pings = crackle(per_s=700, spread_db=4.0, count=30)
    hiss += gain_of(-5.5) * colour(pings, [(12900, 0), (13500, -30)])
    # while the edge is only entering the wood, the hiss is still dull
    hiss -= np.clip(1 - 5 * curl, 0, 1) * (hiss - uniform_filter1d(hiss, size=3))

    # a band with a narrow core climbs along the stroke and wakes each blade mode that it passes
    band = evened(narrowed(breaks, rasp_hz, 620, 1100))
    core = evened(narrowed(breaks, rasp_hz, 200, 330))
    modes = mode_bank(band, BLADE_MODES)
    rasp = gain_of(-7.0) * band + gain_of(-16.0) * core + gain_of(-8.5) * modes
    rasp += gain_of(-3.5) * scatter(colour(breaks, WOOD_SPECTRUM), share=.45, decay_s=.006)
    # the blade's upper resonance speaks while the shaving is still short
    upper = evened(narrowed(breaks, 3650, 600, 700))
    rasp += gain_of(-7.5) * np.clip(1 - 1.3 * curl, 0, 1) * upper

    # the jerking pull bends the board and shakes the bench under it
    pull = fractures(per_s=1600, spread_db=1.6) * gain_of(0.16 * catch_db)
    board = colour(narrowed(pull, board_hz, 60, 130), BODY_SPECTRUM)
    bench = gain_of(-28.0) * bite ** .4 * colour(pull, BENCH_SPECTRUM)
    return hiss * hiss_gain + rasp * bite + board * shake + bench


def scene():
    """The work at the bench, close by, over the low rumble of the room."""
    rasp_hz, board_hz, place, curl, hiss_gain, bite, shake = pulls()
    work = sliding() + knocks() + tearing() + splinters(place, hiss_gain)
    work = work + cutting(rasp_hz, board_hz, curl, hiss_gain, bite, shake)
    tail = gain_of(-19.0) * workshop(work)
    return (work + tail + room_rumble())[None]


EDGE_HZ = 15700  # band limit


def record(dry):
    """One microphone channel: the top of the treble falls away in a step before the band limit."""
    soft = signal.oaconvolve(dry, signal.firwin(255, 13250, fs=SR)[None], "same")
    dull = soft + gain_of(-16.0) * (dry - soft)
    band_limit = signal.firwin(511, EDGE_HZ, window=("kaiser", 9), fs=SR)
    return signal.oaconvolve(dull, band_limit[None], "same")


dry = scene()
out = record(dry)
store_wav(out)
```